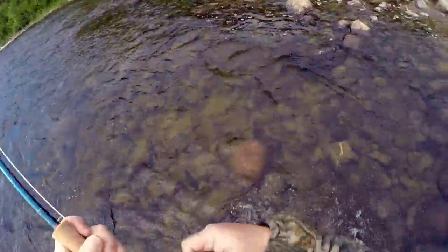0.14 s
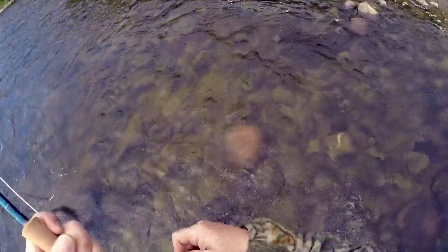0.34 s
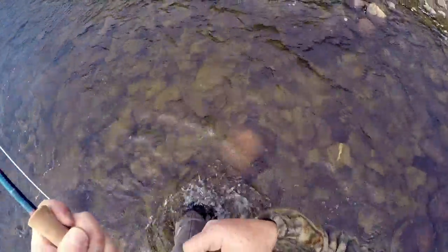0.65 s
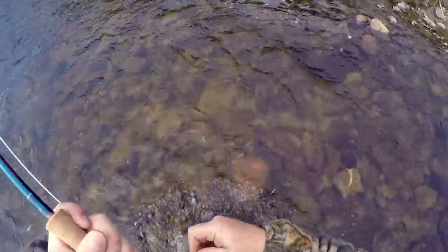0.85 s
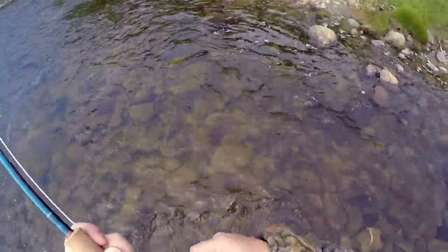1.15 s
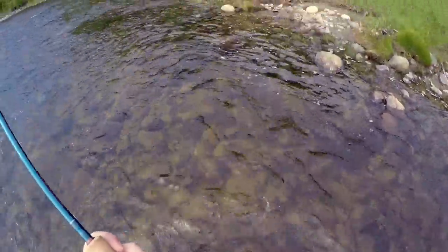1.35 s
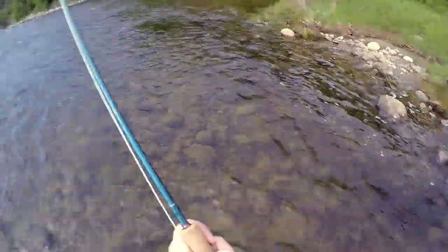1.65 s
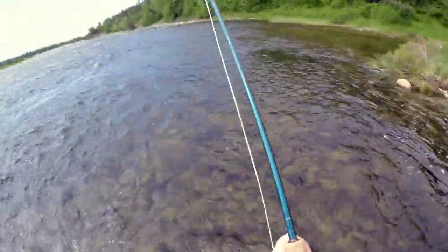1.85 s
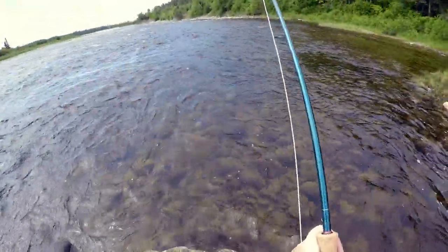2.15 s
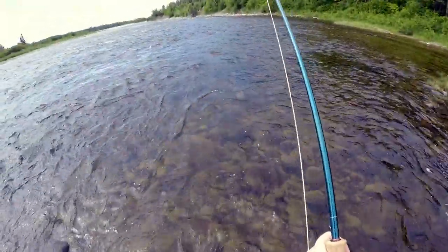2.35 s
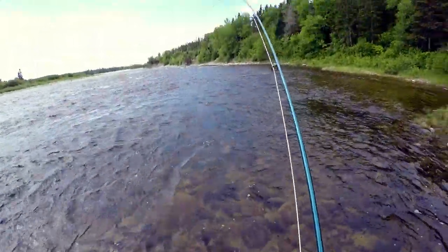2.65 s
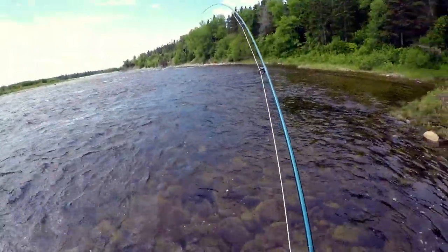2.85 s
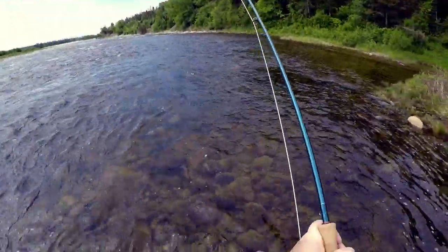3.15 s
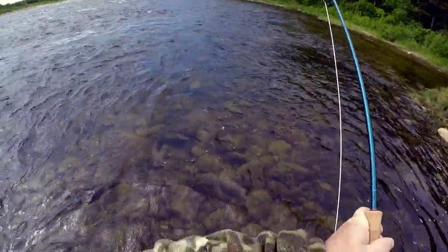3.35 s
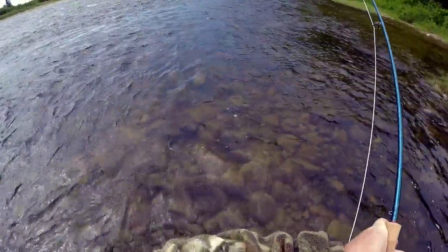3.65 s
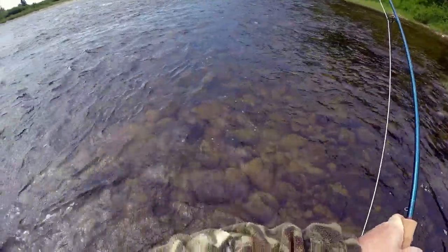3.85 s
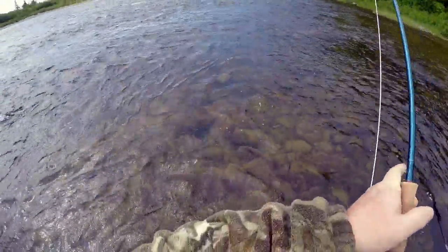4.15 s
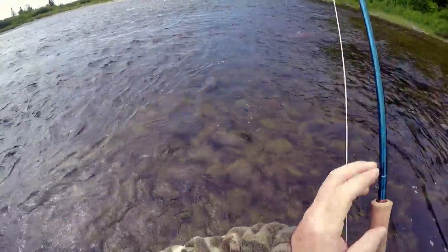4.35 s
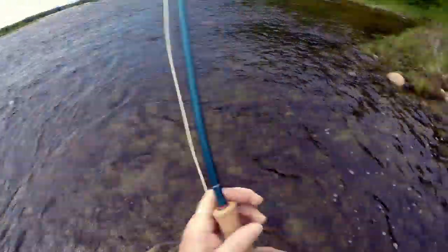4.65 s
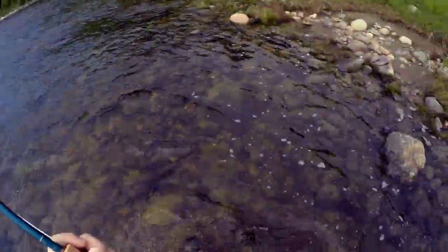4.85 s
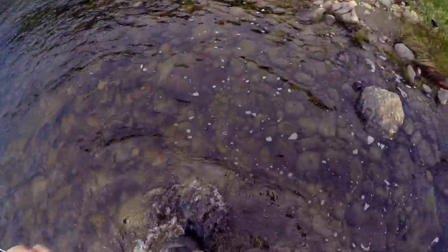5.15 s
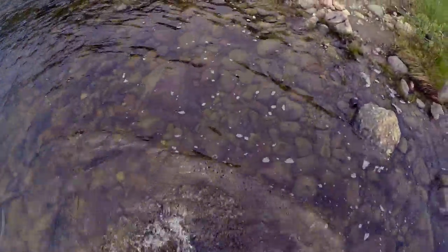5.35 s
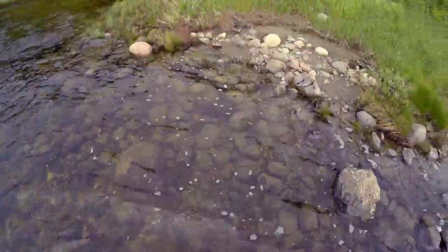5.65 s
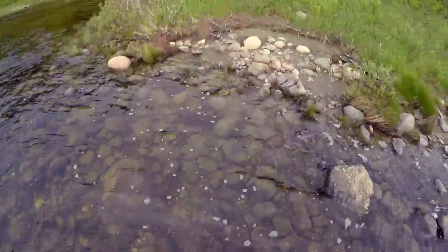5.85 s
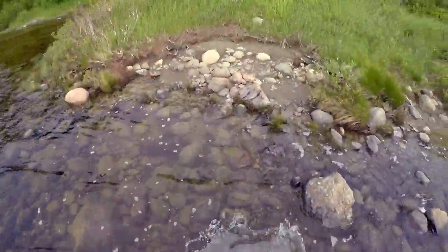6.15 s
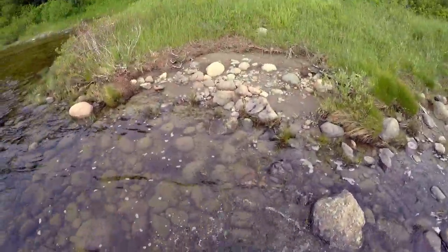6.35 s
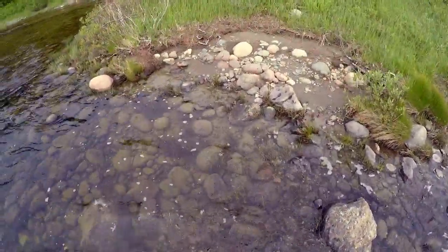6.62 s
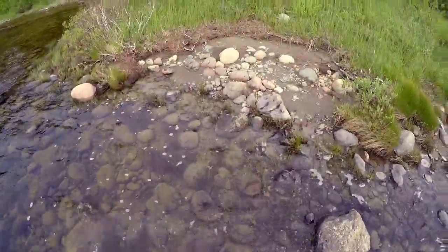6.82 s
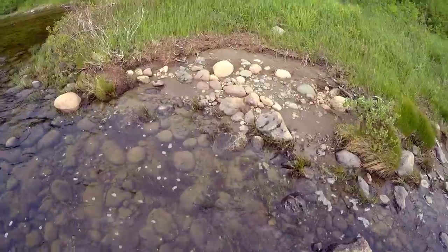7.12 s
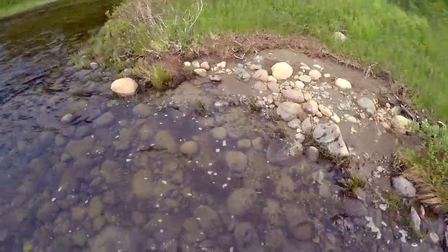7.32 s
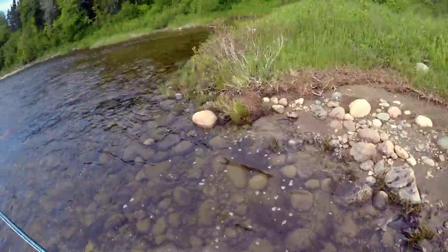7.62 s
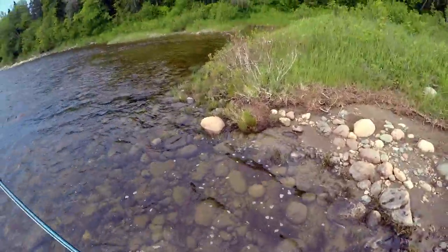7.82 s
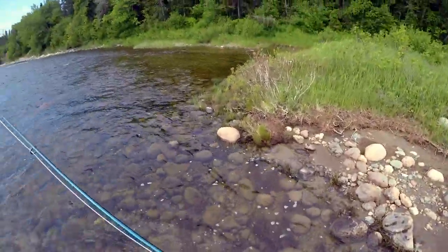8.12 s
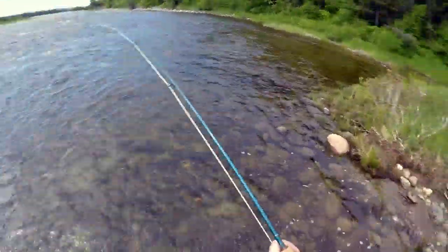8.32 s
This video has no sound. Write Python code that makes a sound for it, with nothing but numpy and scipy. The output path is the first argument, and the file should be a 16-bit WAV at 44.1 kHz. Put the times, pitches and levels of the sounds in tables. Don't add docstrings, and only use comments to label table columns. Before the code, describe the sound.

A ratcheting reel winds in beside a fast stream, then stops; booming wind buffets continue as legs slosh through water and spray patters down.

```python
import sys
import numpy as np
from scipy import signal
from scipy.fft import rfft, irfft, next_fast_len
from scipy.io import wavfile
from scipy.ndimage import uniform_filter1d, map_coordinates

SR = 44100
rng = np.random.default_rng(int(sys.argv[2]) if len(sys.argv) > 2 else 0)


def output_pcm(signal):
    pcm = np.clip(np.atleast_2d(signal).T, -1, 1) * 32767
    wavfile.write(sys.argv[1], SR, np.round(pcm).astype(np.int16))


def rack_gain(trim_db):
    fader = np.asarray(trim_db, float)
    return 10 ** (fader / 20)


N = 373968


def unit(x):
    return x / np.sqrt(np.mean(x ** 2) + 1e-20)


def curves(rows):
    s, *cols = np.transpose(rows)
    return [np.interp(np.arange(N) / SR, s, c) for c in cols]


def peaks_db(floor_db, rows):
    t = np.arange(N) / SR
    slopes = (db - 20 * np.maximum((s - t) / rise, (t - s) / fall) for s, db, rise, fall in rows)
    return 10 * np.log10(rack_gain(2 * floor_db) + sum(rack_gain(2 * level) for level in slopes))


def wobble(rate):
    knots = rng.standard_normal(int(N * rate / SR) + 4)
    return map_coordinates(knots, [np.arange(N) * rate / SR])


def coloured(x, points, peaks=()):
    m = next_fast_len(N + 8192)
    hz = np.fft.rfftfreq(m, 1 / SR)
    f, db = np.transpose(points)
    slope_db = np.interp(np.log(hz + 1), np.log(f + 1), db)
    bumps_db = sum(g / (1 + (2 * (hz - c) / w) ** 2) for c, w, g in peaks)
    return unit(irfft(rfft(x, m) * rack_gain(slope_db + bumps_db), m)[:N])


def patchy(depth_db):
    z = signal.stft(rng.standard_normal(N + 512), nperseg=512)[2]
    field = uniform_filter1d(rng.standard_normal(z.shape), size=5, axis=0)
    field = uniform_filter1d(field, size=8, axis=1)
    return signal.istft(z * rack_gain(depth_db * unit(field)), nperseg=512)[1][:N]


def bubbles(count, hz, spread, cycles, scatter_db):
    when = rng.random((count, 1))
    tone, size = rng.standard_normal((2, count, 1))
    pitch = np.clip(hz * np.exp(spread * tone), 150, 15000)
    k = np.arange(int(min(2.5e6 / count, 900)))
    turn = pitch * k / SR
    wave = np.sin(2 * np.pi * turn * (1 + 0.13 * turn / cycles))
    wave *= np.exp(-3 * turn / cycles) * (1 - np.exp(-2 * turn))
    wave *= rack_gain(scatter_db * np.clip(size, -2, 2)) * np.cos(np.pi / 2 * k / len(k))
    return unit(np.bincount(((when * N).astype(int) + k).ravel(), wave.ravel())[:N])


def ring(modes, t, scatter_db, detune=0.009):
    out = 0
    for hz, db, t60 in modes:
        decay = rack_gain(db + scatter_db * rng.standard_normal() - 60 * t / t60)
        out = out + decay * np.sin(2 * np.pi * hz * t * (1 + detune * rng.standard_normal()))
    return out


def swayed(modes, sway_db):
    return [(hz, db + shift, t60) for (hz, db, t60), shift in zip(modes, sway_db)]


# t/s, level/dB
FLOW = [(0, -40), (.5, -46), (.9, -44), (1.7, -48), (2, -43.5), (2.6, -46), (3.4, -48.5), (3.75, -50),
        (4, -42), (4.4, -52), (4.65, -43.5), (5.4, -41), (5.9, -38), (6.3, -43.5), (6.75, -36), (7.1, -45),
        (7.65, -37.5), (8.48, -43)]
# t/s, level/dB, half length/s
LEG_STEPS = [
    (.72, -40, .08),
    (1.32, -43, .06),
    (1.8, -47, .1),
    (5.2, -45, .15),
    (6.1, -43, .1),
    (8.05, -43, .1),
]
# f/Hz, density/dB
RUSH = [(88, -41), (150, -3), (342, -5), (985, -7.5), (1210, -3.5), (1330, -1), (1530, -4), (2470, -9.5),
        (4000, -14.5), (5200, -43), (8800, -120)]
# f/Hz, density/dB
SPRAY = [(1470, -5.5), (2500, 2), (3720, -3.5), (4270, -7.5), (5150, -11), (5970, -8.5), (8940, -13),
         (13500, -15), (15300, -26), (16000, -61)]
# f/Hz, width/Hz, level/dB
CASE = [(790, 78, 4.5), (1007, 120, 6), (1375, 46, 1), (1657, 170, 4.5), (1784, 110, 3.5), (2430, 600, 4),
        (4366, 420, 7), (5620, 1500, 6)]


def river():
    rush_db, = curves(FLOW)
    flow_spray_db = -3.5 - 43 + 1.05 * (rush_db + 43)
    spray_db = peaks_db(flow_spray_db, [(s, db, 3 * half, 3 * half) for s, db, half in LEG_STEPS])
    swell = wobble(9)
    gurgles = bubbles(count=2800, hz=989.6, spread=0.5906, cycles=8.7, scatter_db=4)
    rush = coloured(patchy(0.91) + 0.27 * gurgles, RUSH, CASE)
    fizz = bubbles(count=9000, hz=4630, spread=0.56, cycles=7.7, scatter_db=2)
    spray = coloured(patchy(1.7) + 0.43 * fizz, SPRAY, CASE)
    return rack_gain(rush_db + 1.5 + 0.27 * swell) * rush + rack_gain(spray_db + 3.5 + 0.5 * swell) * spray


# t/s, level/dB
HOLLOW = [(0, -54), (.4, -62), (1.0, -62), (1.25, -55), (1.85, -51), (2.1, -64), (4.3, -77), (4.61, -56),
          (5.15, -48), (5.45, -55), (5.62, -50), (5.75, -56), (6.27, -58), (6.5, -52), (7.1, -54),
          (7.2, -49), (7.29, -67), (7.9, -60), (8.1, -53), (8.48, -62)]


def burble():
    band = [(850, -51), (1180, -10.5), (1320, -1.5), (1480, -8.5), (1900, -48)]  # f/Hz, level/dB
    return rack_gain(curves(HOLLOW)[0] + 1.5) * coloured(patchy(3.5) * rack_gain(2.5 * wobble(22)), band)


# t/s of the peak, level/dB, rise by 20 dB/s, fall by 20 dB/s
GUSTS = [(-0.001, -18.5, 0.6, 0.13), (0.207, -13.7, 0.06, 0.08), (0.946, -6.9, 0.37, 0.17),
         (1.059, -15.1, 0.03, 0.28), (1.477, -3.0, 0.12, 0.08), (2.055, -10.2, 0.22, 0.11),
         (2.216, -15.3, 0.04, 0.03), (2.361, -11.1, 0.36, 0.06), (2.51, -9.4, 0.15, 0.16),
         (2.757, -6.4, 0.04, 0.09), (2.952, -9.0, 0.2, 0.08), (3.167, -6.0, 0.03, 0.17),
         (3.27, -4.6, 0.08, 0.03), (3.505, -3.7, 0.11, 0.1), (4.055, -2.1, 0.05, 0.14),
         (4.366, -21.6, 0.29, 0.6), (4.807, -12.6, 0.15, 0.19), (5.005, -19.5, 0.09, 0.59),
         (5.209, -15.0, 0.05, 0.12), (5.43, -6.8, 0.11, 0.25), (6.027, -13.5, 0.16, 0.16),
         (6.258, -5.4, 0.16, 0.08), (6.65, -21.6, 0.6, 0.6), (6.962, -9.7, 0.06, 0.05),
         (7.098, -9.0, 0.04, 0.16), (7.305, -8.8, 0.36, 0.04), (7.438, -18.1, 0.14, 0.18),
         (7.724, -5.2, 0.11, 0.07), (8.169, -12.4, 0.28, 0.11), (8.451, -16.1, 0.33, 0.05)]
# f/Hz, level/dB
BOOM = [(5, -32), (14, -1.5), (27, -1), (38, -9), (50, -16), (65, -41), (120, -82.5)]
# f/Hz, level/dB
DAMPING = [(5, 19), (12, 1), (50, 3), (66, -11), (95, -40), (200, -97)]
# t/s, dent level/dB, thump level/dB
FRONTS = [(-.022, -8, -45), (0.838, -22, -32), (1.409, -14.5, -28), (2.015, -21.5, -35),
          (2.721, -23.5, -40), (3.145, -15, -31), (3.22, -35, -36), (3.45, -19, -29), (4.015, -15, -27),
          (5.346, -20, -44), (5.395, -20, -31), (6.145, -24, -42), (6.2, -11.5, -29), (6.93, -35, -43),
          (7.07, -35, -37), (7.66, -17, -29), (8.474, -16, -36)]
# f/Hz, density/dB
THUMP = [(32, -34), (55, -5), (81, -11), (161, -19.5), (248, -29), (439, -37.5), (500, -37), (650, -71),
         (1100, -120)]


def wind():
    boom_db = peaks_db(-29, GUSTS)
    rung = np.sqrt(2) * np.sin(2 * np.pi * np.cumsum(28 * (1 + 0.1637 * wobble(18))) / SR)
    shaken = np.clip((-6 - boom_db) / 20, .2, .8)
    shaking = coloured(rng.standard_normal(N), BOOM)
    pushes = rack_gain(boom_db) * (np.sqrt(1 - shaken ** 2) * rung + shaken * shaking)
    limited = .8 * np.tanh(pushes / .8)
    boom = np.std(pushes) * coloured(limited, DAMPING)

    late_s, rise_s, fall_s = .04, .06, .055
    eddy_db = -37 + .75 * boom_db
    thump_db = peaks_db(eddy_db, [(s + late_s, db, rise_s, fall_s) for s, _, db in FRONTS])
    thump = unit(rack_gain(1.5 * wobble(40)) * coloured(rng.standard_normal(N), THUMP))
    return boom + rack_gain(thump_db + 2.5) * thump


def dents():
    pre_s = .1
    out, t = np.zeros(N + SR), np.arange(SR // 5) / SR
    swing = np.sin(2 * np.pi * np.cumsum(32 + 35 * np.exp(-t / 0.031)) / SR)
    swing *= rack_gain(-60 * t / 0.3) * (1 - np.exp(-t / 0.0076))
    for s, db, _ in FRONTS:
        out[round((s + pre_s) * SR):][:len(t)] += rack_gain(db + 4.0) * swing
    return out[round(pre_s * SR):][:N]


# t/s, level/dB, rise by 20 dB/s, fall by 20 dB/s
SPATTERS = [
    (5.16, -39, .1, .08),
    (5.27, -40, .06, .25),
    (5.55, -43, .3, .3),
    (6.18, -41.5, .35, .3),
    (6.29, -39, .1, .5),
    (6.98, -46, .3, .2),
]
# f/Hz, density/dB
SPATTER = [(2600, -40), (3500, -8), (4300, 0), (5100, -10), (6200, -5), (8000, -11), (14000, -20),
           (16000, -60)]


def spatter():
    grains = bubbles(count=5000, hz=4800, spread=.35, cycles=4.5, scatter_db=5)
    return rack_gain(peaks_db(-80, SPATTERS)) * coloured(patchy(2.5) + 1.1 * grains, SPATTER)


# t/s, peak level/dB, f/Hz, lower ring level/dB
DROPS = [(3.479, -26, 5280, 5), (3.912, -34, 4140, -7), (4.627, -27, 3000, 2.5), (5.0534, -28, 3000, -8),
         (5.0789, -32, 3640, -5), (5.131, -25, 4280, -7), (5.1466, -23, 4660, -17),
         (5.1603, -16.5, 4380, -16), (5.2143, -26, 3980, -9), (5.2545, -22, 4100, -19),
         (5.2894, -22, 4500, -14), (5.3128, -27, 4260, -13), (5.33, -31, 3620, -13),
         (5.3702, -35, 4360, -8), (5.4106, -31, 4270, -18), (5.683, -29, 4100, -15),
         (6.0671, -37, 4330, -4), (6.1016, -23, 4430, -5), (6.5361, -33, 4140, -3), (6.746, -31, 4400, -9),
         (7.0025, -33.5, 4260, -13), (7.0933, -44, 3000, -15), (7.663, -39, 5430, -16)]
# t/s, peak level/dB, f/Hz
PLOPS = [(0.695, -28, 930), (1.319, -30, 900), (1.96, -29, 1020), (2.722, -35, 1470), (2.82, -35, 1320),
         (3.911, -31, 1300), (4.059, -44, 476), (5.161, -21, 990), (5.765, -29, 880), (5.91, -25, 1000),
         (6.048, -32, 465), (6.101, -22, 1330), (6.534, -45, 1250), (6.668, -29.5, 492), (7.17, -32, 1280),
         (7.21, -31, 1400), (7.25, -31, 1520), (7.485, -55, 960), (7.604, -26, 810), (8.375, -35, 550),
         (4.617, -20, 149)]


def drops():
    out, t = np.zeros(N + SR), np.arange(SR // 25) / SR
    for s, db, hz, low_db in DROPS:
        tick = ring([(hz, 0, .01), (1.1 * hz, -5, .008), (1900, low_db, .012)], t, 1.3, detune=.02)
        tick += .15 * rack_gain(-60 * t / .008) * rng.standard_normal(len(t))
        for late, tone in rng.random((4, 2)):
            droplet = ring([(3000 + 4000 * tone, -8, .006)], t, 2.2)
            tick += np.roll(droplet, int(.018 * late * SR))
        out[round(s * SR):][:len(t)] += rack_gain(db - 1.5) * tick * (1 - np.exp(-t / 0.00053))
    for s, db, hz in PLOPS:
        plop = rack_gain(db - 2.0 - 60 * t / 0.037) * np.sin(2 * np.pi * hz * t * (1 + 6 * t))
        out[round(s * SR):][:len(t)] += plop * (1 - np.exp(-t / 0.0015))
    return out[:N]


# t/s, drop level/dB, hold/s
DUCKS = [(0, -8.5, 0.12), (.88, -7.5, 0.3), (1.448, -5.5, 0.11), (2.034, -7.5, 0.2), (2.773, 0, 0.26),
         (3.172, -3, 0.22), (3.485, -5.5, 0.088), (4.037, -7.5, 0.089), (5.409, -13, 0.18),
         (6.25, -11.5, 0.33), (7.13, -6.5, 0.5), (7.696, -16, 0.1)]


def ducking(recover_db=22):
    t, gain_db = np.arange(N) / SR, np.zeros(N)
    for s, drop_db, hold in DUCKS:
        climbing_db = drop_db + recover_db * np.maximum(t - s - hold, 0)
        gain_db = np.where(t < s, gain_db, np.minimum(0, climbing_db))
    return rack_gain(uniform_filter1d(gain_db, int(0.035 * SR)))


# f/Hz, level/dB, t60/s
FRAME = [(1836, -2, 0.047), (2553, 1.5, 0.034)]
SPOOL = [(2780, -1, .018), (3050, -7, .014), (3720, -2, .012), (4130, 2.5, .017), (4400, -2, .014)]
SPRING = [(5984, 4.5, 0.0076), (6270, -1.5, 0.013), (7030, 2.5, 0.0048)]
HANDLE = [(4880, -6, 0.0042), (5000, 5, 0.0061)]
PAWL = [(6570, 8.5, 0.0043), (7705, -1.5, 0.0074), (8110, -3, 0.0055), (10320, -4.5, 0.0083),
        (11530, -9.5, .01), (13770, -5.5, 0.0061), (14900, -12, 0.009)]
# t/s, teeth lost, spread/s
DRAG = [(0.0866, 2.887, 0.049), (0.301, 5.201, 0.083), (0.4715, 0.673, 0.025), (0.5452, 5.7, 0.061),
        (0.7365, 4.702, 0.055), (0.9218, 0.802, 0.025), (1.0541, 1.548, 0.042), (1.2292, 4.174, 0.066),
        (1.4318, 2.063, 0.043), (1.5949, 3.218, 0.061), (1.7399, 5.224, 0.093), (1.9104, 1.108, 0.041),
        (2.0088, 0.893, 0.034), (2.1171, 1.852, 0.057), (2.2235, 5.204, 0.076), (2.3821, 2.115, 0.044),
        (2.4594, 6.93, 0.077), (2.6914, 5.455, 0.062), (2.8287, 8.739, 0.081)]
# t/s, level/dB
CLICKS = [(0, -18), (.35, -14.5), (.63, -14), (.72, -18), (.85, -15.5), (1.35, -13.5), (1.5, -23.5),
          (2.0, -24), (2.1, -20), (2.3, -20.5), (2.85, -30.5)]
# frame, spool, spring, handle, pawl level/dB
FACING_DB = [
    (-15, -5.5, -.5, -18, -2.5),
    (1, -1.5, -18, -3, 1.5),
]


def reel():
    teeth, teeth_per_s, first_s, first_tooth = 151, 76, .01, .3
    turn_s, turn_spread_s = 1.77, .04
    out, t, clock = np.zeros(N + SR), np.arange(SR // 25) / SR, np.arange(N) / SR
    lost = sum(count * (1 + np.tanh((clock - s) / spread)) / 2 for s, count, spread in DRAG)
    passed = first_tooth + teeth_per_s * (clock - first_s) - lost
    speed = np.gradient(passed) * SR
    sway = uniform_filter1d(rng.standard_normal((teeth, 2, len(PAWL))), size=9, axis=0)
    sway_db = 3 * unit(sway)
    tooth_s = np.interp(np.arange(teeth), passed, clock)
    for s, (pawl_sway, spool_sway) in zip(tooth_s, sway_db):
        turned = (1 + np.tanh((s - turn_s) / turn_spread_s)) / 2
        frame_db, spool_db, spring_db, handle_db, pawl_db = np.dot([1 - turned, turned], FACING_DB)
        db = np.interp(s, *np.transpose(CLICKS)) + 0.7 * rng.standard_normal()
        frame_db += .17 * (speed[round(s * SR)] - 55)

        pawl = ring(swayed(PAWL, pawl_sway), t, 1.5, detune=.015)
        pawl += .35 * rack_gain(-60 * t / 0.0076) * rng.standard_normal(len(t))
        snap = rack_gain(pawl_db) * pawl
        snap += rack_gain(spring_db) * ring(SPRING, t, 1.6)
        snap += rack_gain(handle_db) * ring(HANDLE, t, 1.5)
        snap *= 1 - np.exp(-t / 0.00032)

        body = rack_gain(spool_db) * ring(swayed(SPOOL, spool_sway), t, 1.6)
        body += rack_gain(frame_db) * ring(FRAME, t, 1.5)
        body *= 1 - np.exp(-(t / 0.0009) ** 2)

        bounce_s = 0.0016 + 0.00014 * rng.standard_normal()
        bounce = np.pad(snap, (round(bounce_s * SR), 0))[:len(t)]
        out[round(s * SR):][:len(t)] += rack_gain(db - 4.5) * (snap + 0.31 * bounce + body)
    return out[:N]


def scene():
    ducked = ducking() * (river() + spatter() + reel())
    return (burble() + wind() + dents() + drops() + ducked)[None]


def roll_off(x):
    return signal.sosfilt(signal.butter(12, 16440, fs=SR, output="sos"), x)


# f/Hz, level/dB
RESPONSE = [(20, 1), (14300, -0.5), (15000, 4), (15600, -10), (16300, -40), (17000, -60)]


def record(dry):
    hissed = dry[0] + rack_gain(-65) * rng.standard_normal(N)
    heard = np.std(dry) * coloured(hissed, RESPONSE)[None]
    rounded = heard / (1 + np.abs(heard / .85) ** 10) ** (1 / 10)
    return roll_off(rounded)


dry = scene()
out = record(dry)
output_pcm(out)
```